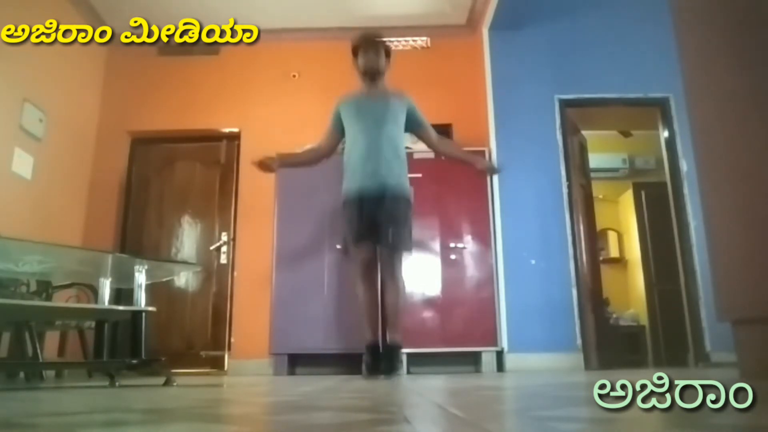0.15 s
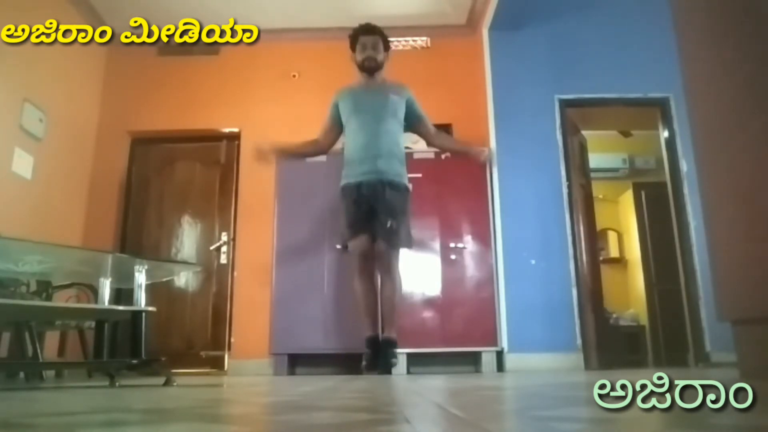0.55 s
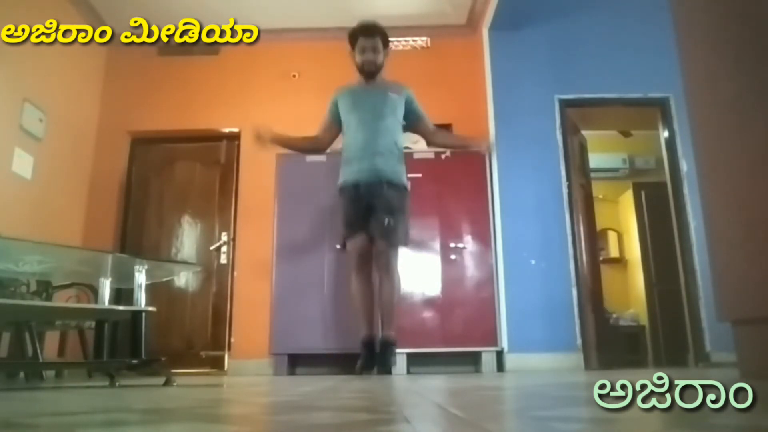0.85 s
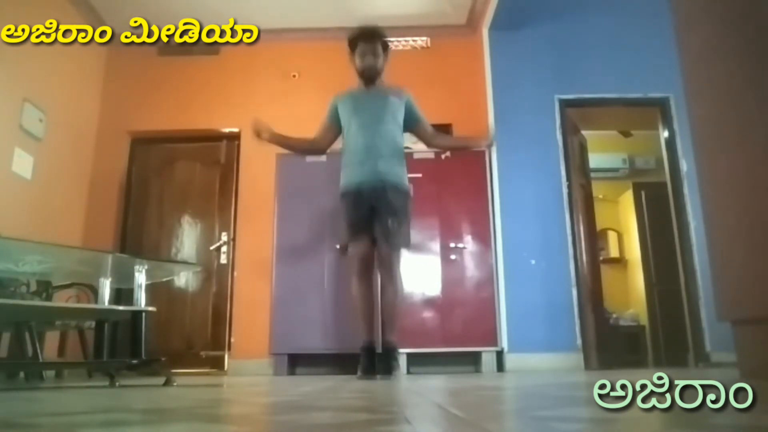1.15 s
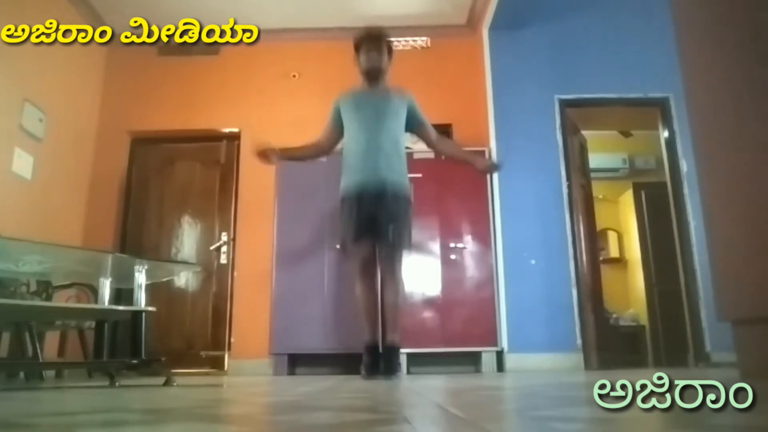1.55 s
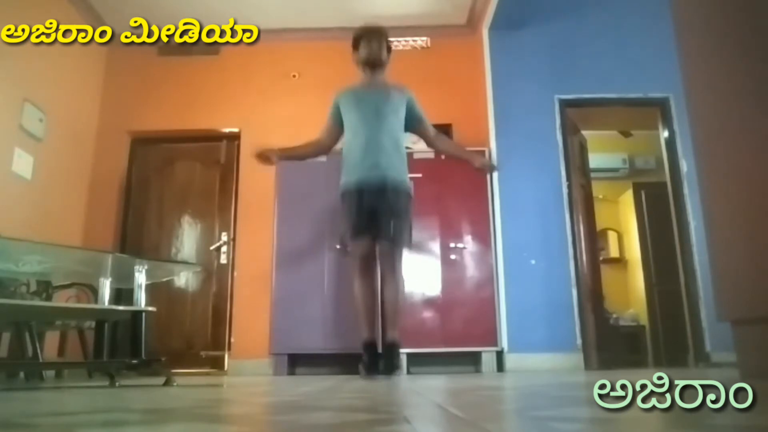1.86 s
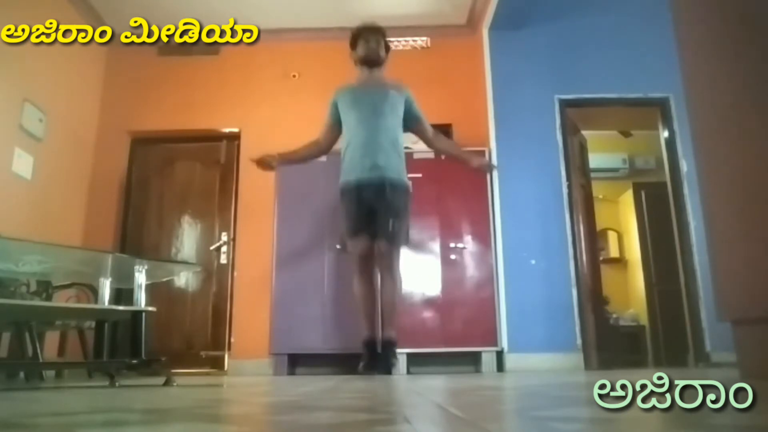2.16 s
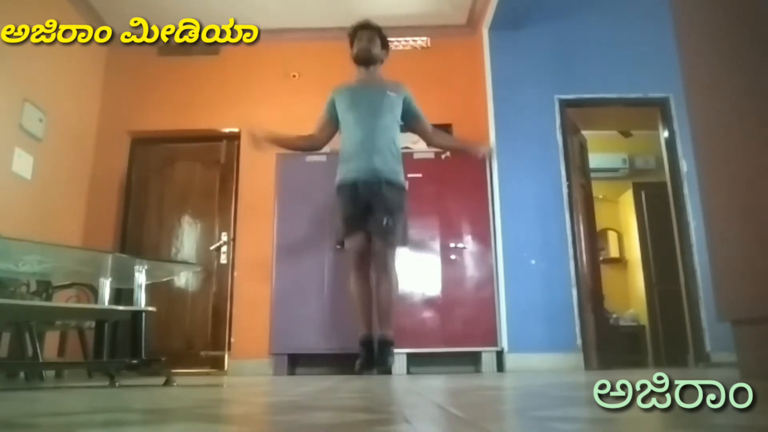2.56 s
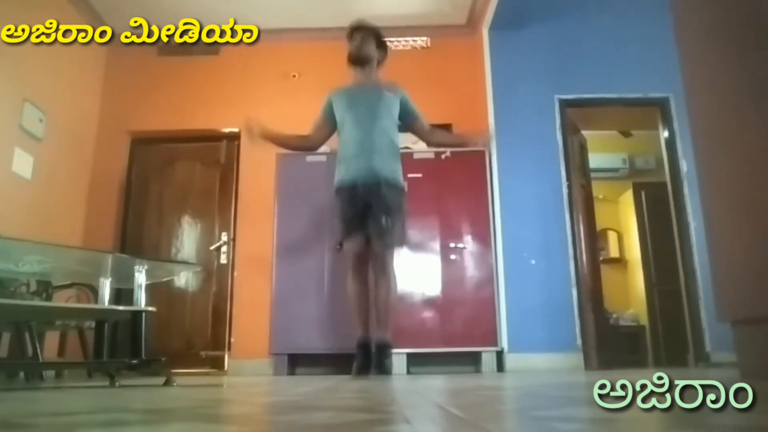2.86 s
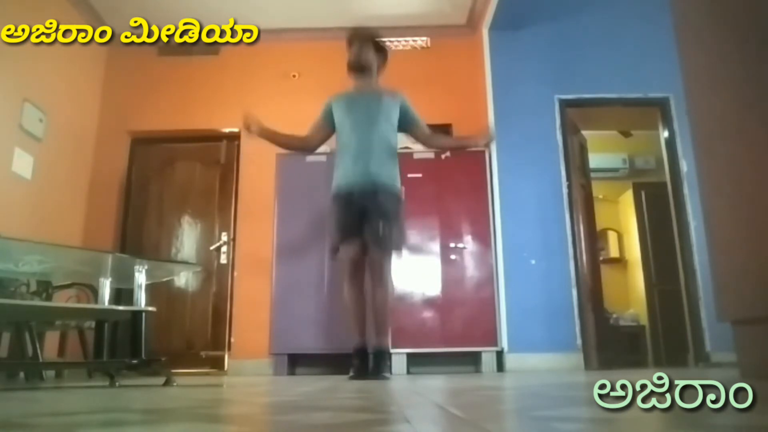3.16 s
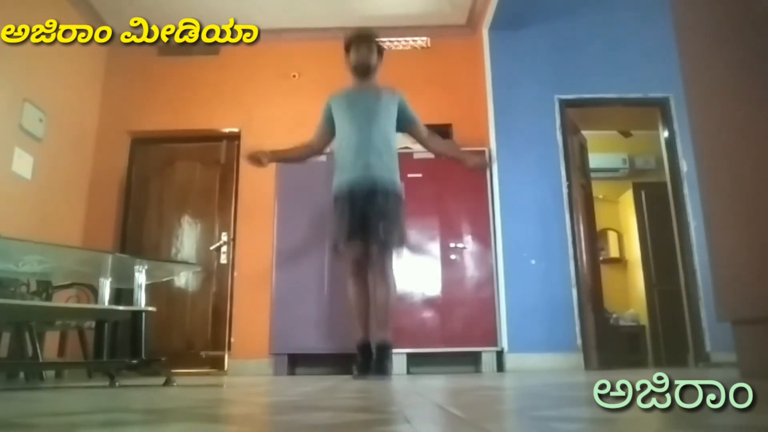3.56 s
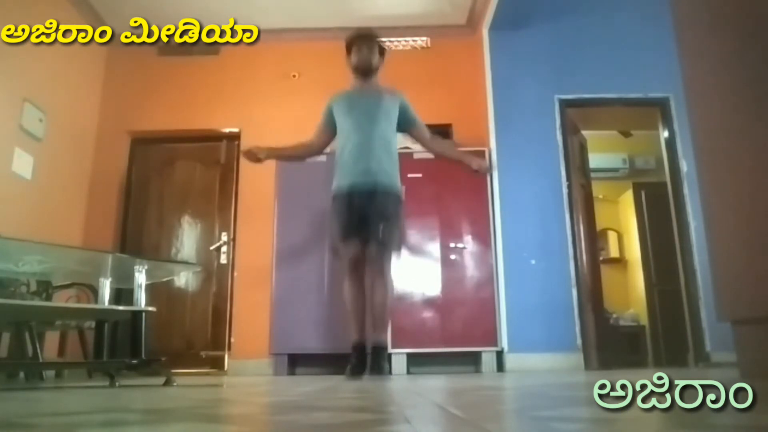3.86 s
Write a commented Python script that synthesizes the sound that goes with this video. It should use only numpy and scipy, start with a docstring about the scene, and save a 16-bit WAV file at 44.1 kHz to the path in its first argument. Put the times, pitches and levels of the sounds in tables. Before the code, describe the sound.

A skipping rope whooshes and cracks steadily on tiles, with soft landings in an echoing room.

```python
"""Skipping rope on tiles

Someone skips in a bare, echoing room, about 3.5 turns a second. On each turn the rope whooshes
down with a rising pitch and cracks on the tiles; the shoes land with a soft thud.
A small microphone near the floor rings in the high treble and clips on the cracks."""
import sys
import numpy as np
from scipy import signal
from scipy.fft import rfft, irfft, next_fast_len
from scipy.io import wavfile
from scipy.ndimage import uniform_filter1d, map_coordinates

SR = 44100
rng = np.random.default_rng(int(sys.argv[2]) if len(sys.argv) > 2 else 0)


def master(y):
    """Save y as 16-bit WAV."""
    cut = np.clip(np.atleast_2d(y).T, -1, 1)
    pcm = np.round(cut * 32767)  # scale
    wavfile.write(sys.argv[1], SR, pcm.astype(np.int16))


N = 4 * SR

# Rope hitting the tiles. Each row: start in s, relative level in dB, contact decay in s, second
# contact's delay in s and gain in dB, midrange gain in dB, T60 of the crack in s.
ROPE_HITS = [(0.1242, -1, 0.0004, .012, -8, 5, 0.55), (0.409, -0.5, 0.0011, 0.014, 0, 5, 0.53),
             (0.6922, 2.5, 0.00091, 0.0017, 2, -4.5, 0.56), (0.975, 4.5, 0.0011, 0.0032, -4, -2.5, 0.48),
             (1.2489, 2, 0.0075, 0.0096, 5, -3.5, 0.46), (1.542, 3.5, .0018, 0.0061, -4, 1.5, 0.49),
             (1.8268, -1.5, 0.0012, .012, -22, -4.5, 0.47), (2.1191, 0.5, 0.0013, 0.0027, -7, 2.5, 0.56),
             (2.3924, -1, 0.0069, 0.0095, 5, -4.5, .54), (2.6951, -3.5, 0.0071, .014, -8, 0, 0.55),
             (2.9672, -2.5, 0.0063, 0.01, 4.5, -1.5, 0.53), (3.2502, -1, 0.0011, 0.0062, -16, 1, 0.57),
             (3.537, 0.5, 0.0027, 0.0075, 2.5, -5, 0.56), (3.825, -0.5, 0.0012, 0.0057, -4, -2, 0.58)]
ROOM_BUILD_S = 0.0029
TIME_S = np.arange(N) / SR


def amp(db):
    """Decibels to gain."""
    return 10 ** (np.asarray(db) / 20)


def unit(x):
    """Scale to rms 1."""
    return x / np.sqrt(np.mean(x ** 2) + 1e-20)


def log_interp(points, hz):
    """Interpolate (Hz, dB) points on a log frequency axis."""
    knot_hz, knot_db = np.transpose(points)
    return np.interp(np.log(hz + 1), np.log(knot_hz + 1), knot_db)


def add(out, start_s, x):
    """Mix x into out."""
    i = max(0, round(start_s * SR))
    out[i:i + len(x)] += x[:max(0, len(out) - i)]


def noise(spectrum):
    """Coloured noise of rms 1."""
    gain = amp(log_interp(spectrum, np.fft.rfftfreq(N, 1 / SR)))
    return unit(irfft(rfft(rng.standard_normal(N)) * gain, N))


def minimum_phase(gain):
    """Causal impulse response of a gain curve."""
    cepstrum = irfft(np.log(np.maximum(gain, 1e-6)))
    half = len(cepstrum) // 2
    cepstrum[1:half] *= 2
    cepstrum[half + 1:] = 0
    return irfft(np.exp(rfft(cepstrum)))[:half]


def wobble(rate_hz, size=N):
    """Smooth random curve, rate_hz knots a second."""
    return map_coordinates(rng.standard_normal(4000), [np.arange(size) * rate_hz / SR], mode="wrap")


def fuzzy_tone(hz, width_hz):
    """Narrow noise around a moving pitch."""
    phase = 2 * np.pi * np.cumsum(hz) / SR
    return unit(wobble(width_hz) * np.cos(phase) + wobble(width_hz) * np.sin(phase))


def patchy(x, depth_db):
    """Random swells and dips, tens of ms long and about 200 Hz wide; rms 1."""
    bins = signal.stft(x, nperseg=1024)[2]
    field = uniform_filter1d(rng.standard_normal(bins.shape), size=5, axis=0)
    field = uniform_filter1d(field, size=5, axis=1)
    return unit(signal.istft(bins * amp(depth_db * unit(field)))[1][:N])


def room_echo(x, t60_s=0.48):
    """Diffuse echo at unit energy gain."""
    t = TIME_S[:SR // 2]
    tail = rng.standard_normal(len(t)) * amp(-60 * t / t60_s) * (1 - np.exp(-t / ROOM_BUILD_S))
    return signal.fftconvolve(x, tail / np.linalg.norm(tail))[:N]


def room_hiss():
    """The room's quiet, steady hiss."""
    # Each row: frequency in Hz, gain in dB.
    hiss_spectrum = [(25, -16), (60, 7.5), (140, -2), (310, -11.5), (450, -16), (750, 5), (950, -14.5),
                     (1350, -19.5), (2000, -15), (3000, -20), (6000, -25), (9000, -24.5), (11800, -10),
                     (15600, -48)]
    return amp(-44.5) * noise(hiss_spectrum)


def whistle(start_hz=3103, sag_hz_per_s=110):
    """A faint, thin whistle comes and goes, sagging slightly."""
    # Each row: time in s, level in dB.
    levels = [(1.52, -58), (1.64, -54.5), (1.85, -43), (1.93, -59.5), (2.02, -42), (2.07, -50), (2.2, -57),
              (2.3, -75)]
    level_db = np.interp(TIME_S, *np.transpose(levels), left=-120)
    pitch_hz = start_hz - sag_hz_per_s * (TIME_S - levels[0][0])
    return amp(level_db) * fuzzy_tone(pitch_hz, width_hz=96)


def scuffs():
    """Shoes and clothes shuffle softly."""
    # Each row: time in s, level in dB.
    levels = [(0, -50), (1.5, -66), (1.901, -48.5), (2.302, -46), (2.7, -50.5), (3.101, -52.5),
              (3.4, -47.5), (3.7, -50), (4, -57.5)]
    # Each row: frequency in Hz, gain in dB.
    scuff_spectrum = [(120, -25), (200, 13.5), (250, -11), (300, -2), (360, 2), (450, -0.5), (600, -7.5),
                      (1200, -32)]
    level_db = np.interp(TIME_S, *np.transpose(levels)) + 2.5 * wobble(16)
    return amp(level_db) * patchy(noise(scuff_spectrum), depth_db=3.5)


def landings(thud_rise_s=0.024, boom_hz=65.4, boom_t60_s=0.35, boom_rise_s=0.0033):
    """Soft soles pat and thud on the floor and set off the room's low boom."""
    # Each row: time in s, thud in dB, boom in dB, decay in s, pat in dB.
    footfalls = [(.002, -23, -22, 0.028, -42), (0.088, -31, -51, 0.025, -48), (0.278, -24, -15, 0.074, -42),
                 (0.597, -34, -33.5, 0.029, -60), (1.12, -28.5, -37, 0.057, -32.5),
                 (1.39, -25.5, -15, .05, -48), (1.507, -30, -22.5, 0.014, -58),
                 (1.689, -26, -35.5, 0.096, -66), (2.001, -31.5, -30, .04, -33.5),
                 (2.249, -30.5, -35, .06, -29.5), (2.54, -46, -49, 0.031, -35.5),
                 (2.846, -30, -30, 0.032, -41), (3.12, -35.5, -26.5, .05, -41.5),
                 (3.22, -35.5, -35, 0.017, -62), (3.4, -33.5, -37, 0.048, -44),
                 (3.675, -28, -21, 0.036, -35), (3.791, -31, -39, 0.011, -51.5),
                 (3.986, -30.5, -41, 0.022, -44)]
    # Floor thud and sole pat. Each row: frequency in Hz, gain in dB.
    thud_spectrum = [(20, -6), (45, -12.5), (85, 11), (135, 6.5), (180, -6.5), (230, -10), (320, -26.5),
                     (600, -32), (2000, -38)]
    pat_spectrum = [(70, -39), (140, 2), (220, -2.5), (290, -15), (450, -36), (1500, -55)]
    thud, pat, boom = np.zeros((3, N))
    for land_s, thud_db, boom_db, decay_s, pat_db in footfalls:
        age_s = np.maximum(TIME_S - land_s, 0)
        press = np.exp(-age_s / decay_s - np.maximum(land_s - TIME_S, 0) / thud_rise_s)
        thud += amp(thud_db) * press
        pat += amp(pat_db) * press
        ring = amp(boom_db - 60 * age_s / boom_t60_s) * (1 - np.exp(-age_s / boom_rise_s))
        boom += ring * np.sin(2 * np.pi * boom_hz * age_s)
    return thud * noise(thud_spectrum) + pat * noise(pat_spectrum) + boom


def rope_whirr(peak_after_s=0.092, sigma_s=0.018):
    """A soft whirr lasts all round the turn and swells as the rope comes back up."""
    # Each row: frequency in Hz, gain in dB.
    whirr_spectrum = [(300, -16.5), (550, -9), (750, 3.5), (1000, 11), (1200, -5), (1500, -7), (3000, -74)]
    upswing = sum(np.exp(-0.5 * ((TIME_S - hit[0] - peak_after_s) / sigma_s) ** 2) for hit in ROPE_HITS)
    level_db = -41 + 3 * upswing + 2.5 * wobble(21.83)
    return amp(level_db) * patchy(noise(whirr_spectrum), depth_db=4.5)


def rope_whoosh(waver=0.0469, lock_db=-24, rush_db=-16, echo_db=-2.5):
    """Each stretch of rope sheds eddies at a pitch that rises as it speeds down."""
    # Each row: peak time in s, level in dB, pitch in Hz, Gaussian sigma in s, glide in octaves/s.
    swings = [(0.076, -20.5, 1154, 0.021, 1), (0.187, -27.5, 1129, 0.03, 0),
              (0.357, -19.5, 1146, 0.016, -1), (0.61, -28.5, 903, 0.0073, 12.5),
              (0.654, -27.5, 1220, .018, 3), (0.956, -24.5, 1111, .018, 1), (1.008, -27.5, 1083, 0.011, 0),
              (1.21, -30.5, 1164, 0.022, 4.5), (1.481, -24.5, 1153, 0.014, 16), (1.787, -29, 1180, 0.03, 4),
              (2.074, -24, 1131, 0.0061, 6), (2.363, -35, 1231, 0.018, 8.5), (2.595, -37, 851, .008, 3),
              (2.639, -37.5, 980.5, 0.03, 7), (2.933, -41.5, 1193, .02, 5.5),
              (3.016, -28.5, 1035, 0.013, 0), (3.173, -33, 1079, 0.029, 10), (3.434, -33, 761.7, 0.0181, 5),
              (3.481, -40, 1197, 0.018, 5.5), (3.754, -34, 1031, .03, 8.5)]
    # Slower and faster stretches of rope. Each row: pitch ratio, gain in dB.
    stretches = [(.74, -4), (.88, 1), (1, 2.5), (1.141, -5), (1.3, -6.5)]
    # Broad rush of air. Each row: frequency in Hz, gain in dB.
    rush_spectrum = [(300, -26), (1000, 11), (1800, -4), (2800, -1), (4000, -12), (8000, -24.5)]
    peaks_s = np.transpose(swings)[0]
    nearest = np.searchsorted((peaks_s[1:] + peaks_s[:-1]) / 2, TIME_S)
    peak_s, level_db, peak_hz, sigma_s, octaves_per_s = np.transpose(swings)[:, nearest]
    offset_s = TIME_S - peak_s
    swell = amp(level_db) * np.exp(-0.5 * (offset_s / sigma_s) ** 2)
    pitch_hz = peak_hz * 2 ** (octaves_per_s * np.clip(offset_s, -2 * sigma_s, 2 * sigma_s))
    eddies = unit(sum(amp(db) * fuzzy_tone(pitch_hz * ratio, width_hz=130) for ratio, db in stretches))
    # A fast, loud swing locks into a clearer tone, equal to the eddies at lock_db.
    clear_tone = unit(np.sin(2 * np.pi * np.cumsum(pitch_hz * (1 + waver * wobble(160))) / SR))
    purity = amp(0.52 * (level_db - lock_db))
    tones = (eddies + purity * clear_tone) / np.hypot(1, purity)
    whoosh = swell * (tones + amp(rush_db) * noise(rush_spectrum))
    return whoosh + amp(echo_db) * room_echo(whoosh)


def room_paths(t60_s, direct_db, direct_s=0.0013):
    """Energy arriving over time: direct sound, wall echoes, diffuse tail."""
    # Each row: delay in s, gain in dB.
    wall_echoes = [(.0117, -18.5), (.0185, -39.5), (0.029, -18), (.048, -25.5)]
    t = TIME_S[:SR // 2]
    energy = (amp(-60 * t / t60_s) * (1 - np.exp(-t / ROOM_BUILD_S))) ** 2
    energy /= energy.sum()
    for delay_s, gain_db in [(direct_s, direct_db)] + wall_echoes:
        energy[round(delay_s * SR)] += amp(gain_db) ** 2
    return energy


def tile_contact(t, decay_s, second_s, second_db, graze_db=-26.5, graze_s=0.0015):
    """The rope grazes the tiles and strikes twice; energy over time, sum 1."""
    first = (t >= 0) * np.exp(-np.abs(t) / decay_s)
    second = (t >= second_s) * np.exp(-np.abs(t - second_s) / decay_s)
    graze = np.exp(-np.abs(t) / graze_s)
    energy = (first + amp(second_db) * second + amp(graze_db) * graze) ** 2
    return energy / energy.sum()


def expander(x, threshold_db=-20.5, depth_db=20, cut_db_per_db=1.61):
    """The microphone turns dying cracks down further below the threshold."""
    level_db = 10 * np.log10(np.abs(uniform_filter1d(x ** 2, size=900)) + 1e-12)
    return x * amp(np.clip(cut_db_per_db * (level_db - threshold_db), -depth_db, 0))


def rope_slaps(gain_db=30.5, lead_s=0.02, ripple_step_hz=537, spike_db=2, spike_decay_s=0.18):
    """Each hit on the tiles sends a treble crack and a longer midrange body round the room."""
    # Each row: frequency in Hz, gain in dB.
    crack_spectrum = [(2000, -48.5), (3500, -33.5), (5200, -25), (7500, -18), (9000, -12.5), (10400, -5),
                      (11700, 1), (13000, -4.5), (15600, -15)]
    body_spectrum = [(150, -54), (400, -33), (1000, -30.5), (2000, -23), (3000, -26), (4500, -25.5),
                     (7000, -28), (15000, -67)]
    out = np.zeros(N)
    hz = np.fft.rfftfreq(2048, 1 / SR)
    t = TIME_S[:SR // 2] - lead_s
    for start_s, hit_db, decay_s, second_s, second_db, mid_db, t60_s in ROPE_HITS:
        ripple_db = 0.5 * map_coordinates(rng.standard_normal(100), [hz / ripple_step_hz], mode="wrap")
        crack = minimum_phase(amp(log_interp(crack_spectrum, hz) + ripple_db / 2))
        body = minimum_phase(amp(log_interp(body_spectrum, hz) + ripple_db))
        contact = tile_contact(t, decay_s, second_s, second_db)
        # The young echo is still made of separate reflections.
        spikes = amp(spike_db * np.exp(-np.abs(t) / spike_decay_s) * wobble(750, size=len(t)))
        bands = [(crack, hit_db, room_paths(t60_s, direct_db=-3)),
                 (body, hit_db + mid_db + 1, room_paths(1.26 * t60_s, direct_db=-6))]
        for colour, band_db, paths in bands:
            envelope = np.sqrt(np.abs(signal.fftconvolve(contact, paths)[:len(t)]))
            burst = spikes * envelope * rng.standard_normal(len(t))
            add(out, start_s - lead_s, amp(gain_db + band_db) * signal.fftconvolve(burst, colour))
    return out


def scene():
    """Rope and feet over the room's hiss, mono."""
    rope = expander(rope_slaps()) + rope_whoosh() + rope_whirr()
    return (rope + landings() + scuffs() + whistle() + room_hiss())[None]


def record(dry):
    """The cracks overload the microphone; nothing is kept above its band limit."""
    clip_level, top_hz, oversample = 0.85, 15750, 4
    size = next_fast_len(N + SR // 4)
    upsampled = oversample * irfft(rfft(dry, size), oversample * size)
    clipped = np.clip(upsampled, -clip_level, clip_level)
    hz = np.fft.rfftfreq(size, 1 / SR)
    spectrum = rfft(clipped)[:, :len(hz)] * (hz < top_hz) / oversample
    return irfft(spectrum, size)[:, :N]


dry = scene()
out = record(dry)
master(out)
```